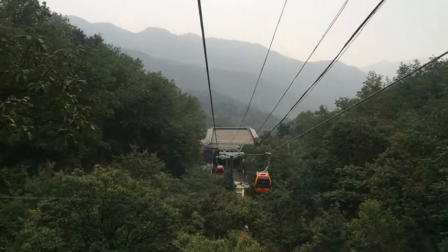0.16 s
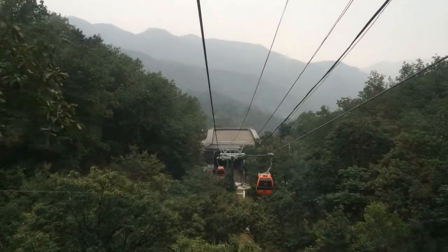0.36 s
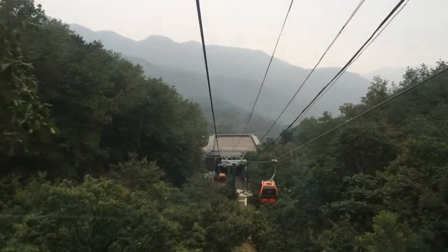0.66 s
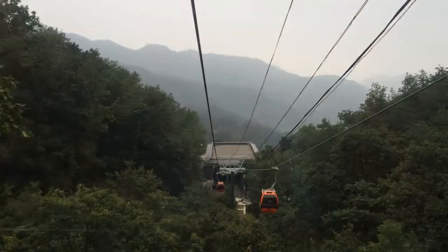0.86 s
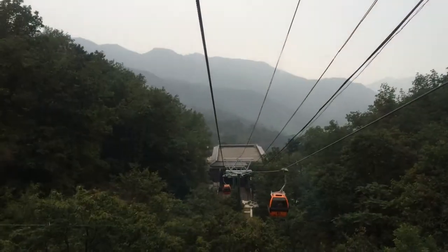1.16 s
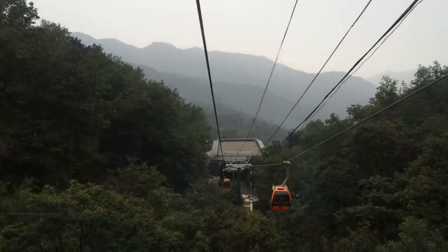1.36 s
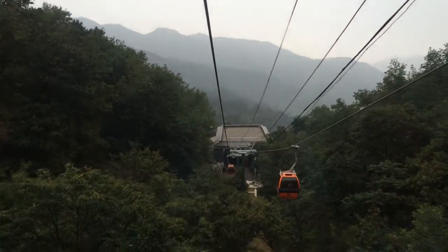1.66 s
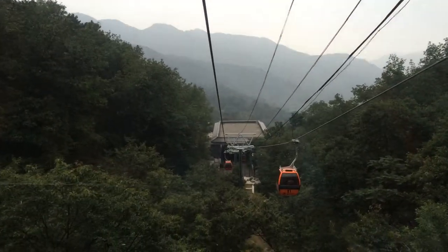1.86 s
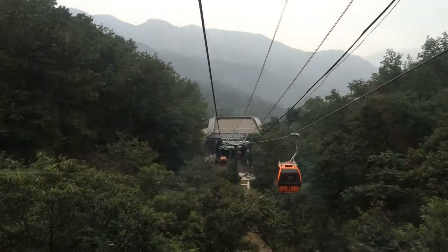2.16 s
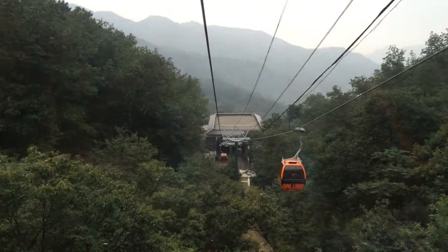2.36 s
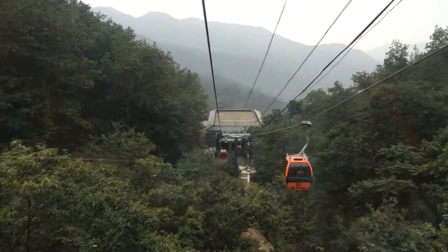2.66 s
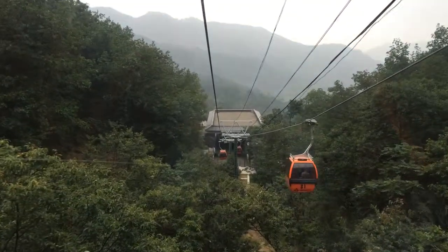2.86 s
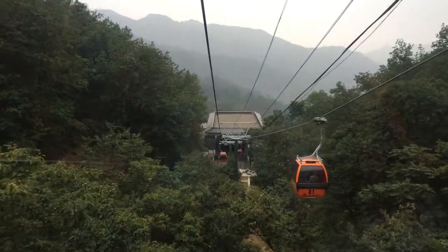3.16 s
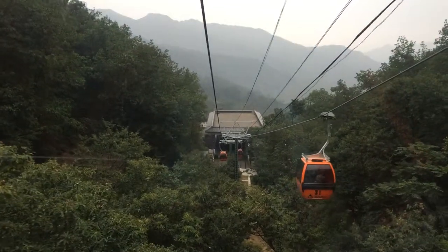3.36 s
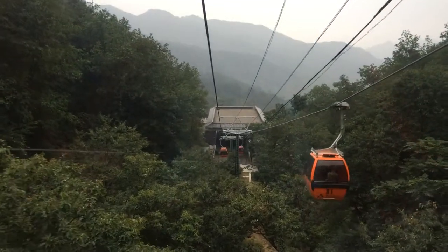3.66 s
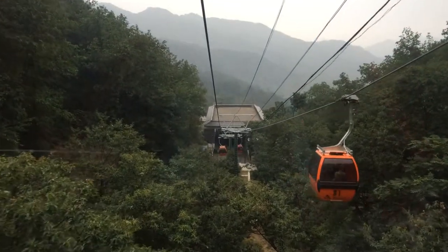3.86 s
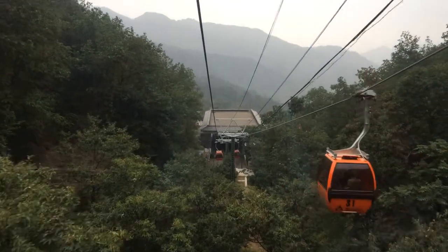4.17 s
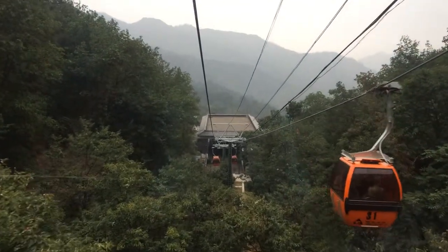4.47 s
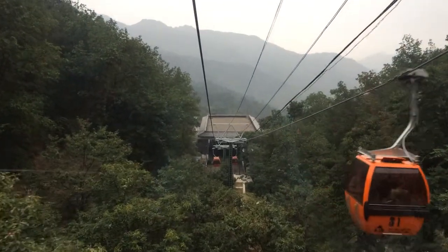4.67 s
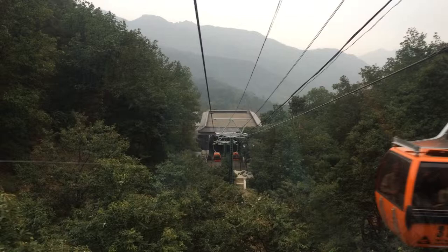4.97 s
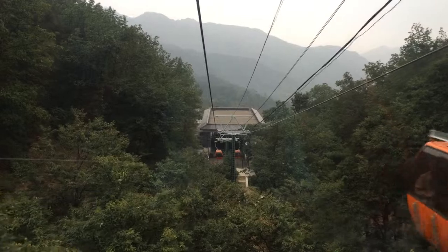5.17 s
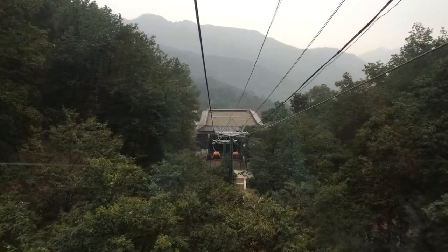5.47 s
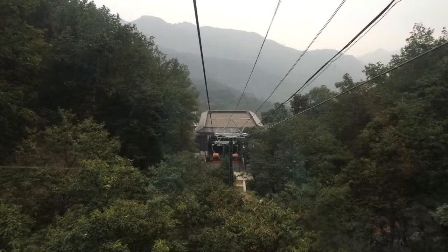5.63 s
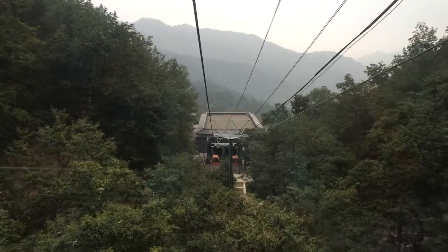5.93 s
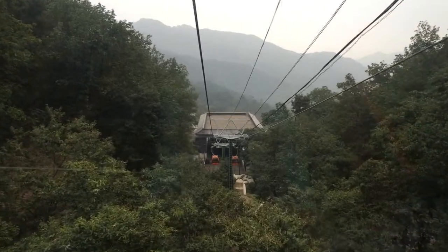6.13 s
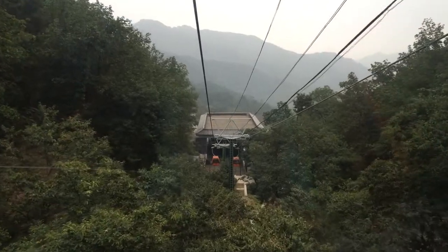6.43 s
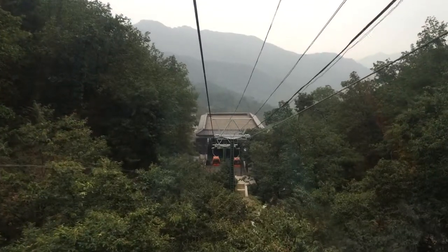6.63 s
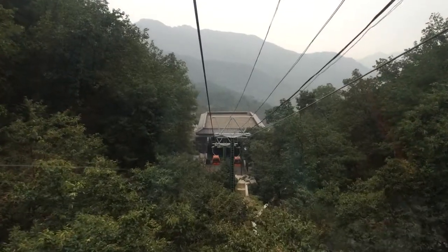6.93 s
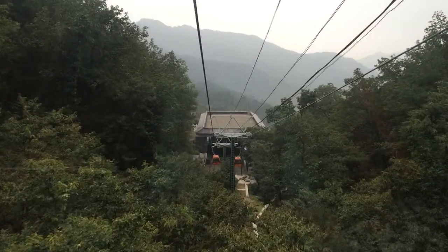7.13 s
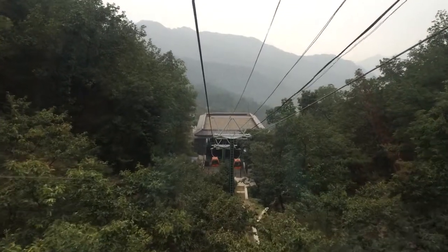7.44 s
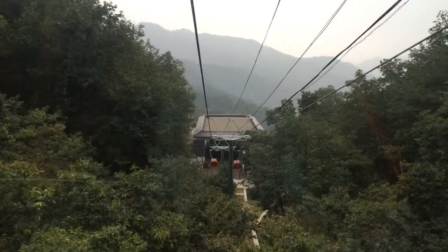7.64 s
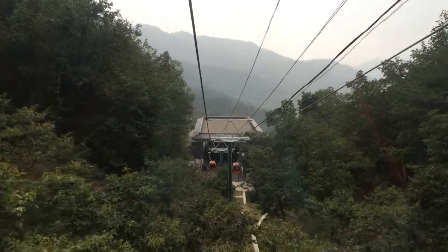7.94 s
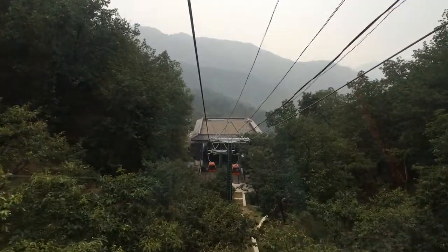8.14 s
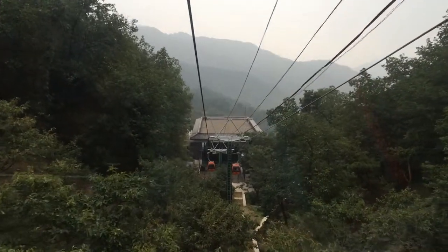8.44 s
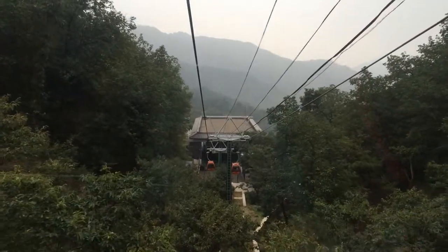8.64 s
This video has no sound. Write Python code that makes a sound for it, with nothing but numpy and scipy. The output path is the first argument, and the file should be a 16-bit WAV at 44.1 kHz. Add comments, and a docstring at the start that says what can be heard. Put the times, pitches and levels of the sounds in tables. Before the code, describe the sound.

Inside a small cable car cabin, a low hum and rumble, a heavy clattering tower crossing early on, then scattered loose rattling knocks.

```python
"""Inside a gondola cabin that hums and rumbles along its cable.
A loose fitting knocks again and again: short noise bursts shaped by the cabin's ring and shared echoes.
Near the start the grip rolls over the wheels of a tower: deep swelling tones thump, and
slammed parts clatter, each with its own echoes.
Filtered noise makes the rumble, buzz and air; faint ticks and squeaks are scattered on top."""
import sys
import numpy as np
from scipy import signal
from scipy.fft import rfft, irfft
from scipy.io import wavfile
from scipy.ndimage import uniform_filter1d

SR = 44100
rng = np.random.default_rng(int(sys.argv[2]) if len(sys.argv) > 2 else 0)


def store_wav(level_fs):
    """Save 16-bit WAV to argv[1]."""
    pcm = np.round(np.clip(np.atleast_2d(level_fs), -1, 1) * 32767)
    wavfile.write(sys.argv[1], SR, pcm.T.astype(np.int16))


N = 388080
TIME = np.arange(N) / SR  # seconds
HZ = np.fft.rfftfreq(16384, 1 / SR)  # the frequencies at which all spectra are drawn
BLOW_TIME = np.arange(len(HZ)) / SR  # seconds since a blow began; each blow is 0.19 s long

# Ring of the cabin. Each row: pitch in Hz, width in Hz, strength in dB.
CABIN = [(328.4, 23, -4), (378, 23, -3), (441.7, 30.5, 2), (511, 26, -1), (556, 36, -7), (645, 99, -11.5),
         (744, 18.5, 2.5), (835.7, 30, 2), (880, 38, -24), (1173.4, 20, -6), (1373, 35, -6),
         (1486, 33, -1.5), (1567, 36, -4), (1671, 16, -7), (1814, 29.5, -2.5), (1901, 62, -4),
         (2220, 10, -10), (2380, 54, -8.5), (2390, 12, -8.5), (2614, 17, -24), (2440, 23, -3),
         (2716, 35, -10), (3040, 13, -10), (2926, 35, -7.5), (3110, 12, -27), (3320, 15, -13),
         (3670, 12, -14), (3660, 12, -15), (3380, 13, -29), (4330, 17, -24.5)]
# Hollow resonances of the panels. Each row: pitch in Hz, width in Hz, strength in dB.
PANELS = [(214.5, 10.7, 6), (259, 23, 2.5), (330, 10.2, 8), (373, 72, 1), (457, 27, 3.5), (524, 20.4, -1),
          (617, 18, -4), (759, 55, -9), (858, 7.6, -8.5)]
# The shell soaks up the top of the ring. Each row: frequency in Hz, change in dB.
DAMPING = [(200, 6), (2200, 5), (2900, -4), (4500, -1), (6000, -3.5), (8000, -12), (10000, -11),
           (11200, -17), (12500, -3), (15000, -5)]


def gain_of(db):
    """Turns decibels into a factor."""
    return 10 ** (np.asarray(db) / 20)


def evened(x):
    """Scales a signal to an average strength (rms) of 1."""
    return x / np.sqrt(np.mean(x ** 2) + 1e-20)


def add(mix, s, sound):
    """Mixes a sound in at a time in seconds."""
    part = mix[max(round(s * SR), 0):][:len(sound)]
    part += sound[:len(part)]


def spectrum(points):
    """Joins (Hz, dB) points by straight lines on a logarithmic frequency axis."""
    hz, db = np.transpose(points)
    return np.interp(np.log(HZ + 1), np.log(hz + 1), db)


def resonances(modes):
    """Adds up the power of resonances that each peak at one pitch; gives the spectrum in dB."""
    power = 0
    for hz, width, db in modes:
        distance = (HZ ** 2 - hz ** 2) / (width * (HZ + 1))
        power = power + gain_of(db) ** 2 / (1 + distance ** 2)
    return 10 * np.log10(power)


def coloured(x, db):
    """Filters without any sound ahead of the blow (minimum phase), so that attacks stay sharp."""
    log_gain = np.log(gain_of(np.maximum(db, db.max() - 100)))
    circle = np.concatenate([log_gain, log_gain[-2:0:-1]])
    taps = np.fft.ifft(np.exp(np.conj(signal.hilbert(circle)))).real
    return signal.oaconvolve(x, taps[:len(HZ)])[:len(x)]


def noise(db):
    """Steady noise of a given spectrum, rms 1."""
    run_in = len(HZ)  # dropped again, so that the filter has settled
    return evened(coloured(rng.standard_normal(N + run_in), db)[-N:])


def wander(rate):
    """Smooth random drift of rms 1, fading out for changes faster than about rate per second."""
    hz = np.fft.rfftfreq(N, 1 / SR)
    return evened(irfft(rfft(rng.standard_normal(N)) * np.exp(-(hz / rate) ** 2), N))


def reflections(diffuse_db, t60, treble_loss):
    """One blow bouncing round the cabin: single echoes and a dense tail; treble dies first.

    The tail alone falls 60 dB in t60 seconds; treble_loss is in dB per second at 1 kHz.
    """
    # First reflections between the walls. Each row: delay in seconds, level in dB.
    first_echoes = [(0.0003, -8), (0.004, -8), (0.007, -3.5), (0.0134, -1.5), (0.0215, 0)]
    build_up = 1 - np.exp(-BLOW_TIME / 0.0058)
    tail = rng.standard_normal(len(HZ)) * gain_of(-60 * BLOW_TIME / t60) * build_up
    taps = gain_of(diffuse_db) * tail / np.linalg.norm(tail)
    for s, db in first_echoes:
        spread = rng.standard_normal(200) * np.hanning(200)  # curved walls smear each echo over a few ms
        add(taps, s, gain_of(db) * spread / np.linalg.norm(spread))
    hz, age, z = signal.stft(taps, SR, nperseg=128)
    # the loss stops growing after 35 ms
    loss_db = treble_loss * np.sqrt(hz[:, None] / 1000) * np.minimum(age, .035)
    return signal.istft(z * gain_of(-loss_db), SR, nperseg=128)[1][:len(HZ)]


def struck(taps, db):
    """Gives the reflections the spectrum of the struck part; rms 1 over the first 34 ms."""
    power = uniform_filter1d(abs(rfft(taps, 2 * len(HZ) - 2)) ** 2, size=15)
    sound = coloured(taps, db - 10 * np.log10(power + 1e-12))
    return sound / np.sqrt(np.mean(sound[:1500] ** 2))


def ride(shake_db):
    """The cable hums; the shaking rumbles in the shell and drones in the panels."""
    # Swells of the cable hum. Each row: time in seconds, level in dB before the trim below.
    hum_swells = [(0.0, -22), (0.06, -35), (0.19, -19.5), (0.33, -40.5), (0.6, -32), (1.4, -33.5),
                  (2.5, -32), (3.15, -30.5), (3.7, -45.5), (3.97, -31.5), (4.17, -54), (4.35, -34.5),
                  (6.35, -35.5), (8.8, -36)]
    # Colour of the rumble. Each row: frequency in Hz, relative strength in dB.
    rumble_colour = [(15, -40), (25, -15), (38, -0.5), (54, 0), (75, 2.5), (88, -5.5), (104, 1), (126, 0.5),
                     (148, -6), (175, -11.5), (220, -18.5), (400, -49), (1000, -84.5)]
    hum_hz, throb_db, throbs_per_s = 64.4, 3, 5.5  # the hum throbs unevenly
    hum_db = np.interp(TIME, *np.transpose(hum_swells)) + throb_db * wander(rate=throbs_per_s)
    turns = np.cumsum(hum_hz + 2.0 * wander(rate=7.97)) / SR
    hum = gain_of(hum_db - 0.5) * np.sin(2 * np.pi * turns)

    # the octave follows only 0.59 of each dB of the hum's swells
    octave_db = -20.5 + 0.59 * hum_db + 1.1 * wander(rate=5.2)
    octave = gain_of(octave_db) * np.sin(4 * np.pi * turns + 0.5 * wander(rate=3.2))

    rumble = gain_of(-38 + shake_db) * noise(spectrum(rumble_colour))

    panels = resonances(PANELS) + spectrum([(900, -4.5), (3000, -12.5), (8000, -16.0)])
    drone_db = -49 + 0.97 * shake_db + 1.23 * wander(rate=29)
    return hum + octave + rumble + gain_of(drone_db) * noise(panels)


def buzz(shake_db):
    """Hundreds of tiny contacts a second keep the cabin faintly ringing, the more so the harder it shakes."""
    loose_db = 6.5  # above this much shake more parts come loose, and the buzz grows faster
    grains = rng.standard_normal(N) * (rng.random(N) < 500 / SR)
    colour = resonances(CABIN) + spectrum([
        (300, -7.5), (1100, 8.5), (1700, 5.5), (2150, -2.0), (2600, -1.0), (3500, -2.0), (8000, -19)])
    level_db = -70 + shake_db + 1.35 * np.maximum(shake_db - loose_db, 0)
    return gain_of(level_db + 1.8 * wander(rate=8)) * evened(coloured(grains, colour))


def air():
    """Steady filtered noise makes a soft hiss of air."""
    # Colour of the hiss. Each row: frequency in Hz, relative strength in dB.
    air_colour = [(200, 9.5), (700, 18), (1050, 23), (1500, 1), (2200, 4), (2900, 0.5), (4000, -1),
                  (7000, 1), (11000, -1.5), (15000, -1)]
    return gain_of(-72) * noise(spectrum(air_colour))


def whisper():
    """Noise round one resonance makes a soft, narrow hiss that wavers in the background."""
    narrow = 2 * resonances([(2100, 440, 0)])  # doubling the dB makes the peak narrower still
    return gain_of(-77 + 3.5 * wander(rate=3.5)) * noise(narrow)


def knocks():
    """The fitting clacks, then the cabin rings; it strikes the same spot, so all knocks share most echoes."""
    # Knocks of the loose fitting. Each row: time in seconds, relative level in dB,
    # hardness as a treble tilt in dB per octave (from 1800 to 6000 Hz).
    knock_list = [(0.096, -62.5, -2), (0.188, -44, -2), (0.269, -56.5, -3.5), (0.389, -45, 1.5),
                  (0.440, -45, -1), (1.313, -52, -6.5), (1.395, -54, -7), (1.568, -51, 0), (1.815, -45, -4),
                  (1.935, -48.5, 0), (2.002, -43.5, -7), (2.055, -50, -15), (2.102, -35.5, 0.5),
                  (2.169, -39, -1.5), (2.378, -52.5, 1), (2.629, -48.5, -2.5), (2.688, -46, -2),
                  (2.886, -50, 0), (3.043, -51, -31), (3.092, -49, -5), (3.158, -53, -11),
                  (3.264, -53.5, -4.5), (3.322, -56, -7), (3.377, -55, -2), (3.436, -46, 1.5),
                  (3.59, -49, 0), (3.681, -47, 0.5), (3.869, -60, -20), (3.933, -63.5, -10),
                  (4.107, -57, -11), (4.152, -55.5, -2), (4.231, -47, -0.5), (4.289, -56.5, -5),
                  (4.325, -50, 0), (4.521, -41.5, 0.5), (4.734, -51, -0.5), (4.872, -41.5, -2),
                  (4.943, -41.5, 2), (5.000, -43.5, -2), (5.158, -55.5, -2.5), (5.377, -49.5, -4.5),
                  (5.489, -52, -6.5), (5.607, -52.5, -11), (5.752, -51, -3), (5.844, -55, -4),
                  (5.902, -53.5, -3), (5.953, -58.5, -23), (6.033, -47, 1.5), (6.086, -48.5, -3),
                  (6.131, -47.5, -2), (6.311, -56, -47), (6.516, -61.5, -7), (6.673, -54.5, -8.5),
                  (6.748, -61, -30), (6.803, -63.5, -17), (7.094, -61, -8), (7.142, -54.5, -14),
                  (7.311, -51, -7.5), (7.422, -51, -5.5), (7.512, -58, -4), (7.705, -55.5, -32),
                  (7.806, -59.5, -29), (8.070, -61.5, -41), (8.246, -57, -36), (8.35, -48.5, -15.5),
                  (8.456, -58, -29), (8.637, -52.5, -2.5)]
    # Broad resonances of the loose fitting. Each row: pitch in Hz, width in Hz, strength in dB.
    fitting = [(1670, 370, -3), (2675, 200, 2), (3350, 260, -12.5), (4470, 1220, -15)]
    shared = reflections(diffuse_db=5, t60=.13, treble_loss=100)
    ring = resonances(CABIN) + spectrum(DAMPING) + spectrum([
        (300, -2), (1900, -3.0), (2800, 1.5), (7000, -5.0), (15000, -7.5)])
    clack = resonances(fitting) + spectrum([
        (400, -21), (1500, 11.0), (3100, 4.5), (4800, -2), (7000, -5), (10000, -0.5), (15000, -7.0)])
    octaves = np.log2(np.clip(HZ, 1800, 6000) / 1800)
    seating = 1 - np.exp(-BLOW_TIME / .004)  # the loose part beds in over a few ms
    contact = rng.standard_normal(len(HZ)) * seating ** 2 * gain_of(-60 * BLOW_TIME / 0.071)
    panel_hz = 333
    panel = np.sin(2 * np.pi * panel_hz * BLOW_TIME) * seating * gain_of(-60 * BLOW_TIME / 0.5)

    out = np.zeros(N)
    for s, db, tilt_db in knock_list:
        # no two contacts are quite alike
        chatter = gain_of(-6) * reflections(diffuse_db=6.0, t60=0.12, treble_loss=130)
        soft_db = tilt_db * octaves  # a soft blow lasts longer and excites less treble
        sound = gain_of(db + 4.5) * seating * struck(shared + chatter, ring + soft_db)
        sound += gain_of(db - 3.0 + .5 * tilt_db) * struck(contact, clack + soft_db)
        # the hum of a wall panel falls off steeply for weaker knocks
        sound += gain_of(db + 4.0 + 1.93 * min(db + 35.5, 0)) * panel
        add(out, s - .001, sound)

    # faint taps of the fitting between its knocks, spread over 11 dB and dull (-23 dB per octave)
    taps_per_s = 6
    taps = gain_of(-58.5 - 11 * rng.random(N)) * (rng.random(N) < taps_per_s / SR)
    tap = seating * struck(shared, ring - 23 * octaves)
    return out + signal.oaconvolve(taps, tap)[:N]


def jolts():
    """Shoves through the hanger make the shell boom for a cycle or two; the open cable adds small ones."""
    # Jolts through the hanger. Each row: time in seconds, relative level in dB, pitch in Hz.
    jolt_list = [(0.176, -34, 72), (0.489, -18, 78.1), (0.56, -4.5, 93.4), (0.686, -15.5, 116),
                 (0.745, -6.5, 116), (0.763, -2.5, 118), (0.782, -6, 109), (0.829, -4.5, 96),
                 (0.92, -8.5, 91.5), (0.965, -11, 121), (1.051, -9.5, 117), (1.135, -6.5, 117),
                 (1.247, -8.5, 87), (1.293, -12, 95), (1.327, -14.5, 111), (2.088, -12, 122),
                 (4.627, -18.5, 111), (5.971, -18, 90), (6.292, -16, 100), (6.340, -18, 85)]
    shoves_per_s, shove_hz = 5.0, 93.4  # small random shoves
    swell = BLOW_TIME / 0.009
    boom = swell ** 2 * np.exp(2 * (1 - swell))  # strongest after 9 ms
    out = np.zeros(N)
    for s, db, hz in jolt_list:
        add(out, s, gain_of(db - 6.5) * boom * np.sin(2 * np.pi * hz * BLOW_TIME))
    shoves = gain_of(-31) * rng.uniform(0.54, 1, N) * (rng.random(N) < shoves_per_s / SR)
    return out + signal.oaconvolve(shoves, boom * np.sin(2 * np.pi * shove_hz * BLOW_TIME))[:N]


def clatter():
    """Different parts slam in turn, each with its own echoes: a ring, a crack and a hollow body."""
    # Doors and frame slam over the tower. Each row: time in seconds,
    # then the relative levels of ring, crack and body in dB.
    slams = [(0.5788, -13, -40.5, -44), (0.6688, -38, -77, -34), (0.69, -17.5, -49, -31),
             (0.7449, -20, -50.5, -26.5), (0.769, -15, -46, -27), (0.7886, -26, -46.5, -25),
             (0.8104, -46, -56, -39), (0.8841, -16.5, -45, -46), (0.9535, -19, -66, -27.5),
             (0.9905, -20.5, -55.5, -42), (1.0073, -23.5, -53, -39), (1.0835, -29, -81, -47),
             (1.1265, -32, -74, -28.5), (1.1547, -18, -59.5, -26), (1.1718, -51, -72, -33)]
    # Colour of the crack. Each row: frequency in Hz, relative strength in dB.
    crack_colour = [(800, -16), (2000, 3.5), (2900, 8.5), (3600, 1), (4700, -3), (5500, -6), (7500, -13),
                    (9000, -15), (9950, -7), (11000, -26), (12400, -9.5), (14700, -24)]
    ring = resonances(CABIN) + spectrum(DAMPING) + spectrum([
        (300, -4.0), (900, -4), (1300, -7.0), (2000, -8.5), (3000, 6.0), (6000, -6)])
    crack = spectrum(crack_colour)
    body = resonances(PANELS) + spectrum([
        (220, -8.5), (330, 1.5), (450, -0.5), (640, 7.0), (800, 10), (1080, 10.0), (2000, 14), (5000, -18.5)])
    out = np.zeros(N)
    for s, ring_db, crack_db, body_db in slams:
        # each part has its own colour
        own_db = 2 * evened(uniform_filter1d(rng.standard_normal(len(HZ)), size=50))
        ring_echoes = reflections(diffuse_db=12.5, t60=0.14, treble_loss=46)
        crack_echoes = reflections(diffuse_db=10, t60=0.12, treble_loss=34)
        body_echoes = reflections(diffuse_db=4.5, t60=0.16, treble_loss=170)
        sound = gain_of(ring_db - 12.0) * struck(ring_echoes, ring + own_db)
        sound += gain_of(crack_db + 8.0) * struck(crack_echoes, crack + own_db)
        sound += gain_of(body_db - 3) * struck(body_echoes, body + own_db)
        add(out, s - .003, sound)
    return out


def ticks():
    """Very light scuffs of the trim: each is only a short puff of treble noise."""
    # Tiny dry ticks. Each row: time in seconds, relative level in dB.
    tick_list = [(1.244, -47), (2.0038, -47), (2.332, -54), (2.631, -47), (2.8853, -51), (3.3774, -53),
                 (4.145, -45), (4.6778, -56), (5.4864, -50), (5.905, -52)]
    # Colour of a tick. Each row: frequency in Hz, relative strength in dB.
    tick_colour = [(1000, -20), (3000, 1), (5000, -2), (8000, 1.5), (10000, -1), (11200, 0), (12500, -3),
                   (15000, 0.5)]
    out = np.zeros(N)
    shape = (1 - np.exp(-BLOW_TIME / .003)) * gain_of(-60 * BLOW_TIME / .06)
    for s, db in tick_list:
        puff = rng.standard_normal(len(HZ)) * shape
        add(out, s - .002, gain_of(db - 21.0) * struck(puff, spectrum(tick_colour)))
    return out


def squeaks():
    """Thin, unsteady whistles: single tones that rise and fall a little."""
    # Faint squeaks. Each row: start in seconds, length in seconds, pitch in Hz at the middle
    # (before the random wobble), level in dB.
    squeak_list = [(1.92, 0.089, 10300, -71), (7.28, .15, 8850, -81)]
    out = np.zeros(N)
    for s, length, hz, db in squeak_list:
        arch = np.sin(np.linspace(0, np.pi, round(length * SR)))
        pitch = hz * (1 + .08 * (arch - 1) + .008 * wander(rate=680)[:len(arch)])
        add(out, s, gain_of(db) * arch * np.sin(2 * np.pi * np.cumsum(pitch) / SR))
    return out


def scene():
    """Everything heard from inside the cabin, over a soft hiss of air."""
    # How hard the cabin shakes, most of all over the tower.
    # Each row: time in seconds, dB above smooth running.
    shake = [(0.0, -1), (0.21, 5.5), (0.36, -1), (0.48, 3.5), (0.57, 15.5), (0.8, 17), (1.05, 10),
             (1.22, 11.5), (1.38, -2), (1.9, 1.5), (2.12, 6), (2.35, 2), (4.1, -1.5), (4.6, 0.5), (6.7, 0),
             (6.93, -8), (7.1, 0.5), (8.8, -1.5)]
    # small random bumps on top
    shake_db = np.interp(TIME, *np.transpose(shake)) + 1.4 * wander(rate=12)
    steady = ride(shake_db) + buzz(shake_db) + air() + whisper()
    blows = knocks() + jolts() + clatter() + ticks()
    return (steady + blows + squeaks())[None]


def record(dry):
    """Takes away the highest treble with a steep filter and softens both ends over about 9 ms."""
    edge_hz = 15350
    soft = dry * signal.windows.tukey(N, .002)
    low_pass = signal.firwin(511, edge_hz, window=("kaiser", 9), fs=SR)
    return signal.oaconvolve(soft, low_pass[None], "same")


dry = scene()
out = record(dry)
store_wav(out)
```